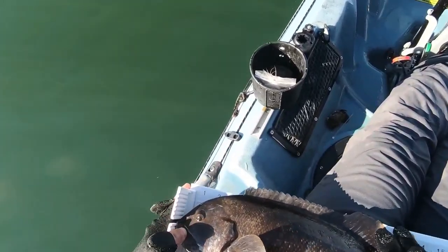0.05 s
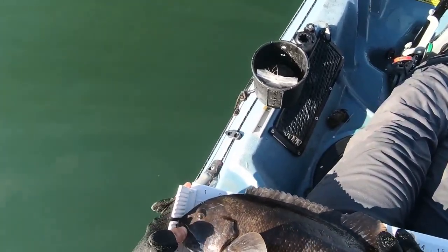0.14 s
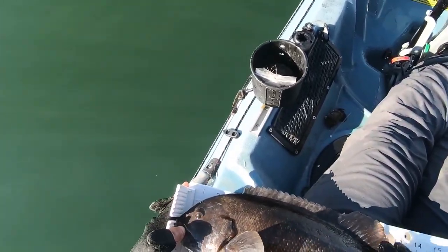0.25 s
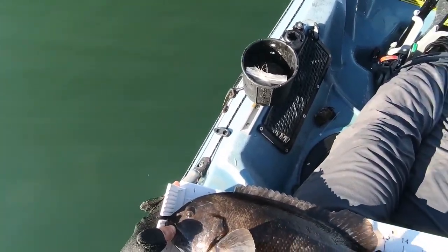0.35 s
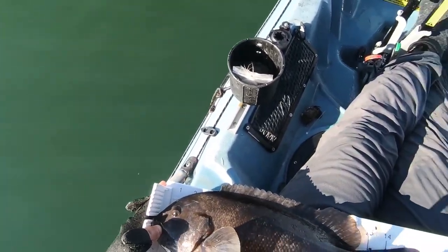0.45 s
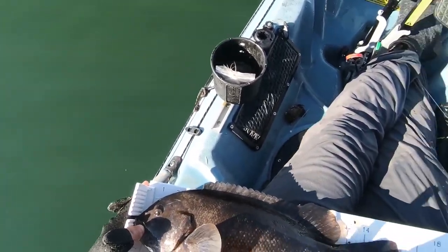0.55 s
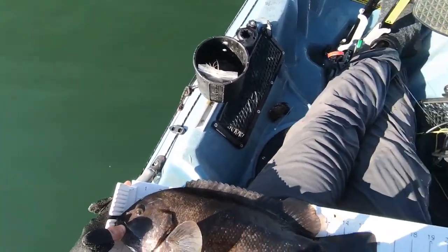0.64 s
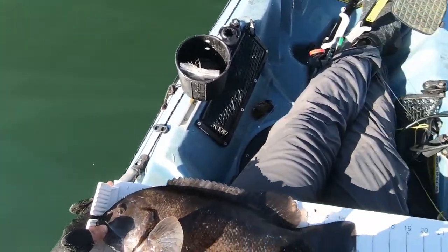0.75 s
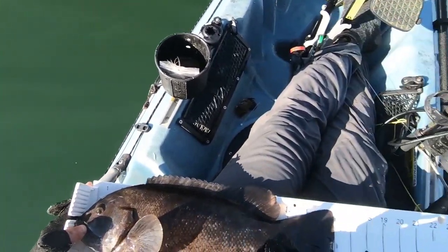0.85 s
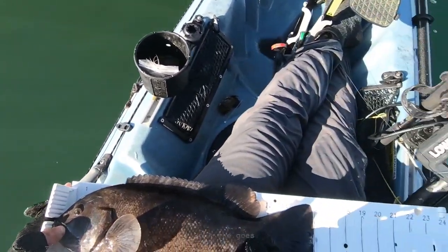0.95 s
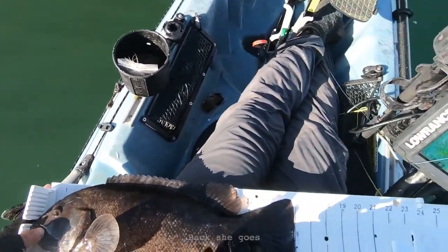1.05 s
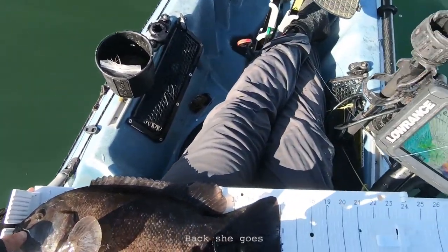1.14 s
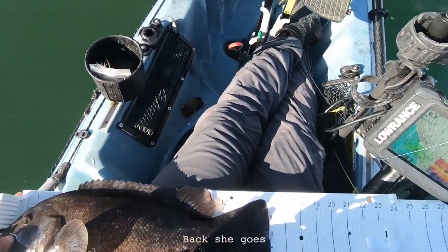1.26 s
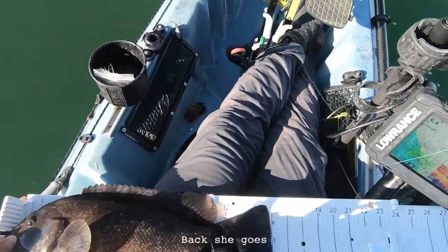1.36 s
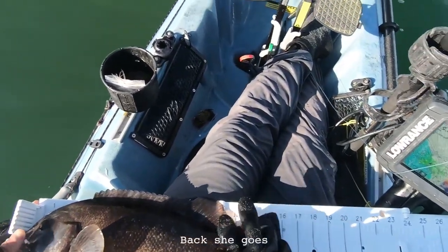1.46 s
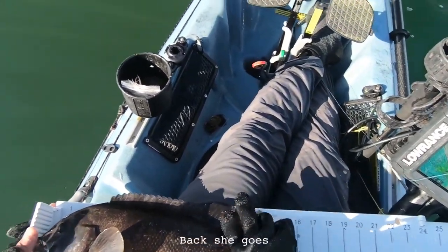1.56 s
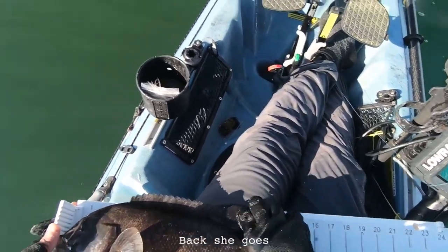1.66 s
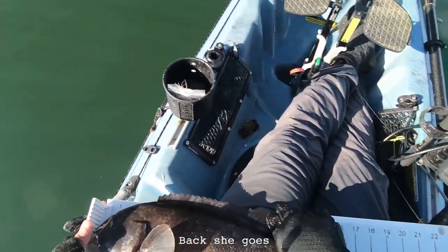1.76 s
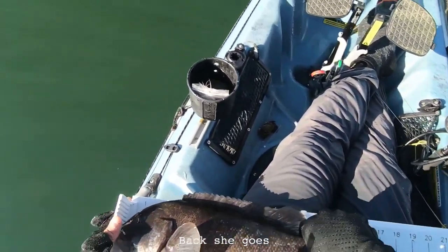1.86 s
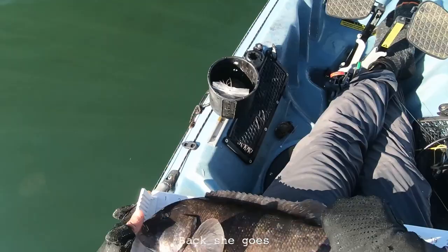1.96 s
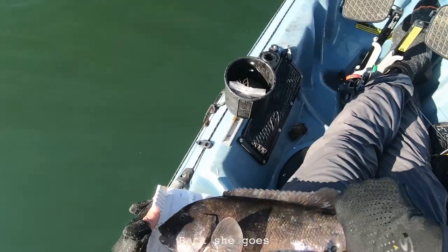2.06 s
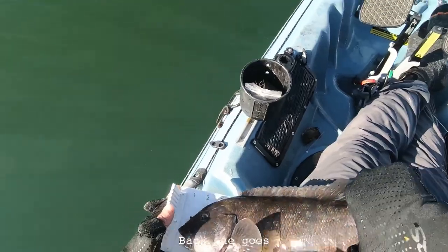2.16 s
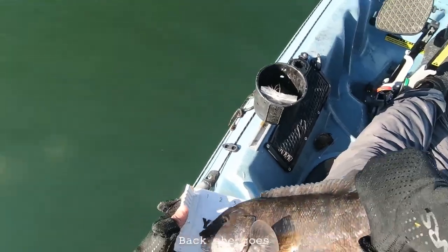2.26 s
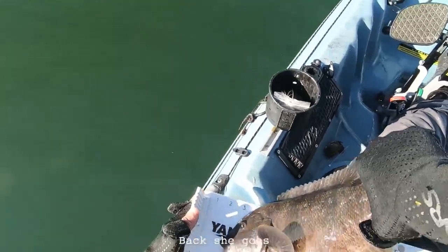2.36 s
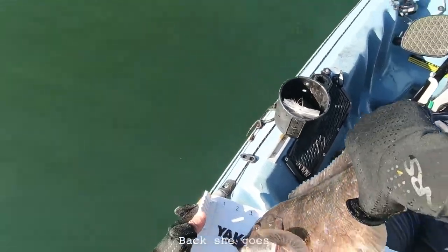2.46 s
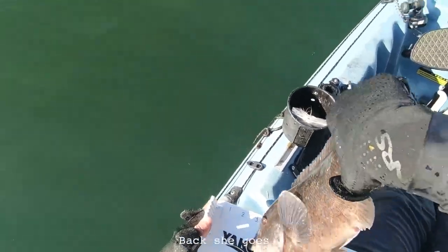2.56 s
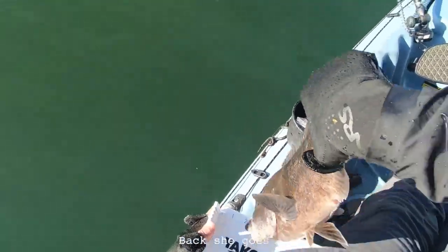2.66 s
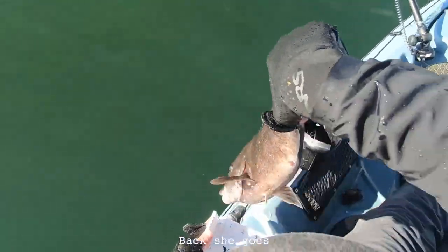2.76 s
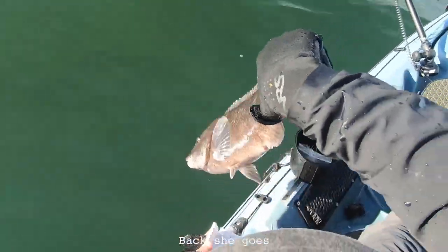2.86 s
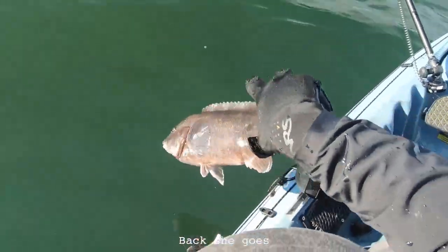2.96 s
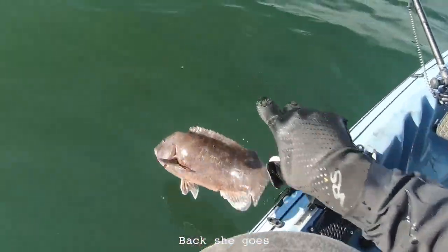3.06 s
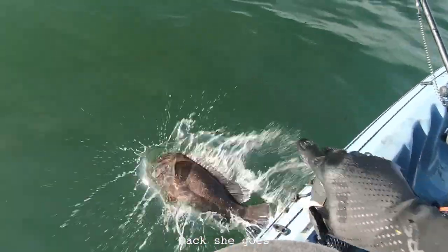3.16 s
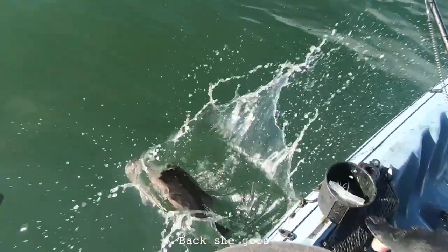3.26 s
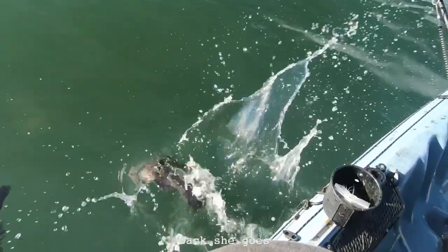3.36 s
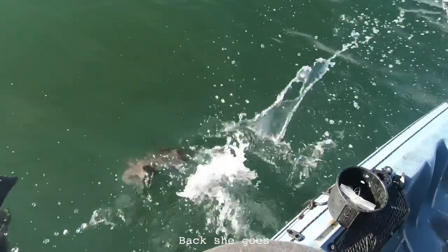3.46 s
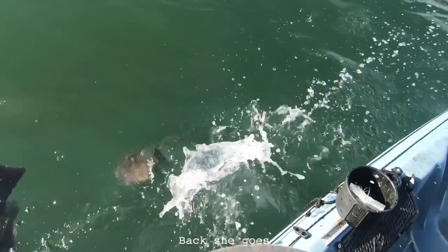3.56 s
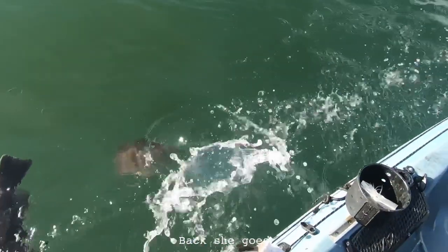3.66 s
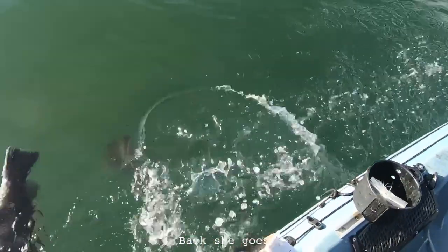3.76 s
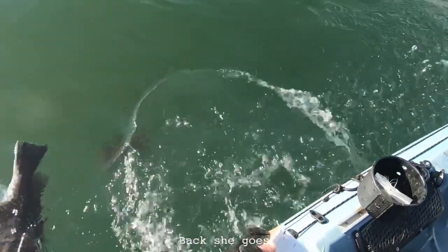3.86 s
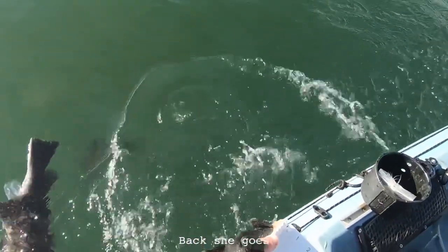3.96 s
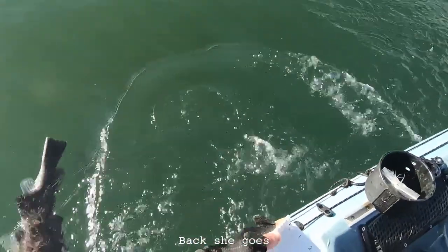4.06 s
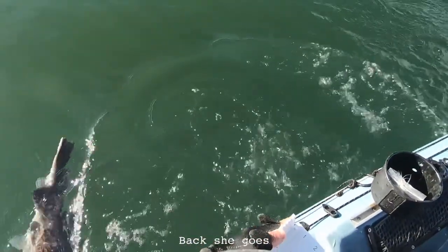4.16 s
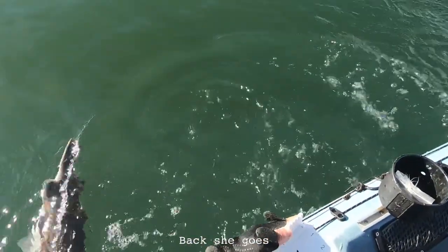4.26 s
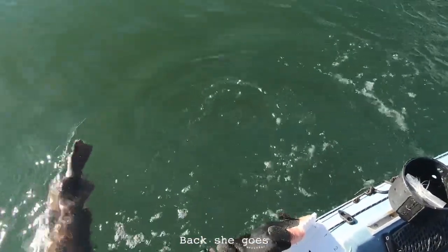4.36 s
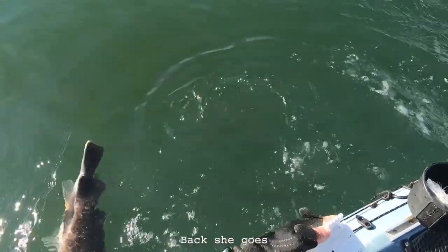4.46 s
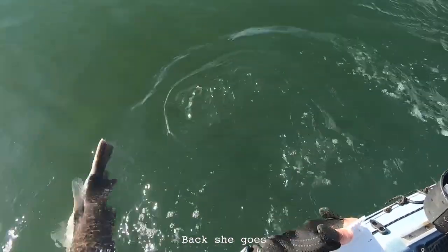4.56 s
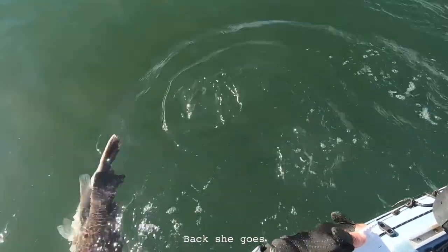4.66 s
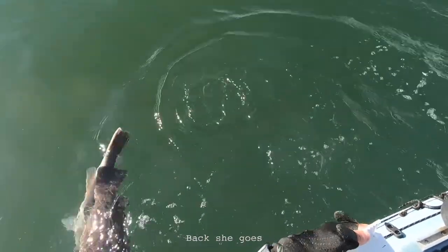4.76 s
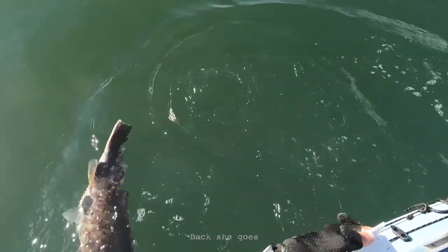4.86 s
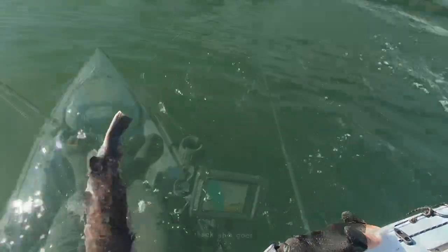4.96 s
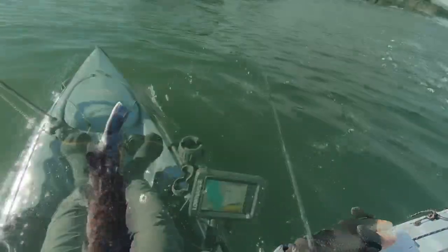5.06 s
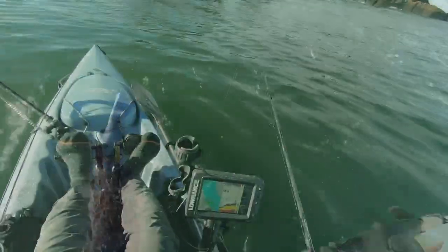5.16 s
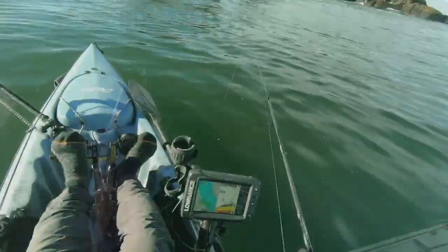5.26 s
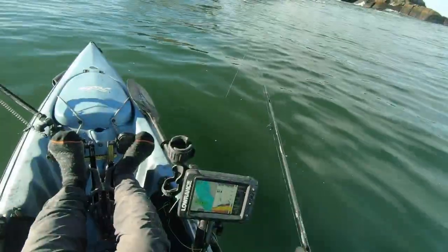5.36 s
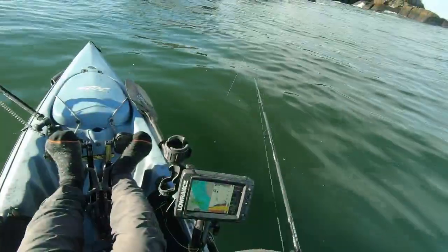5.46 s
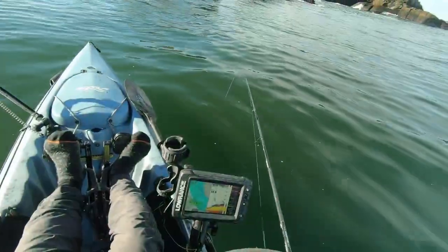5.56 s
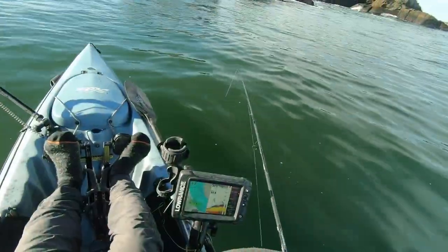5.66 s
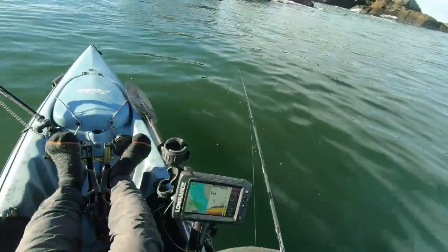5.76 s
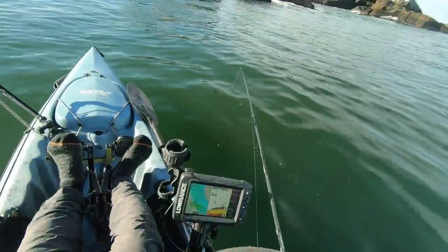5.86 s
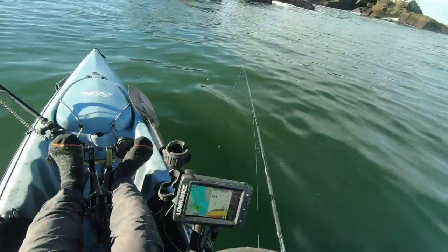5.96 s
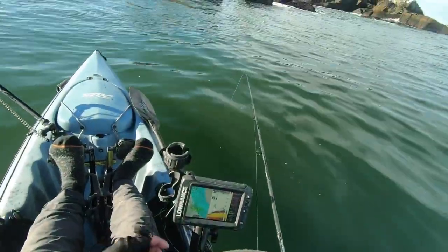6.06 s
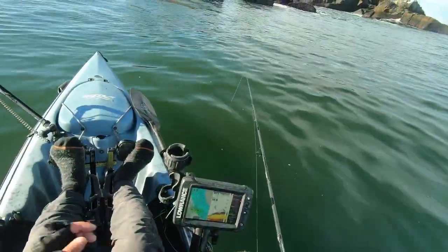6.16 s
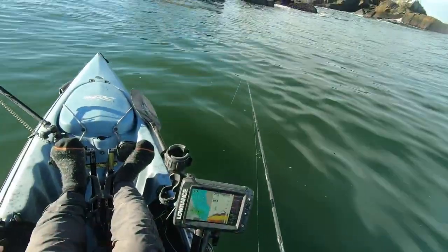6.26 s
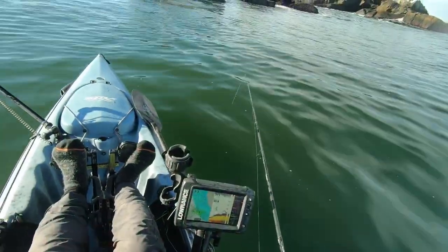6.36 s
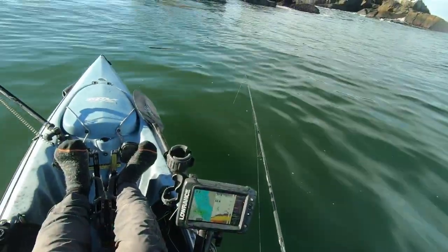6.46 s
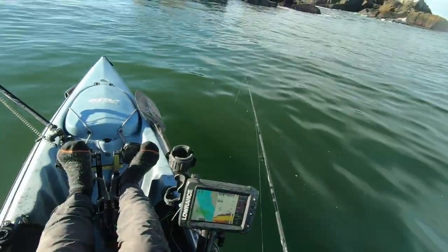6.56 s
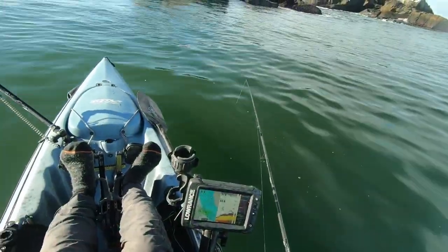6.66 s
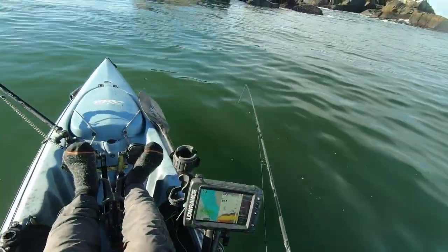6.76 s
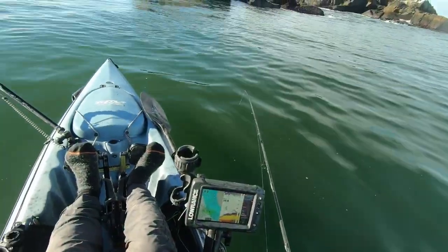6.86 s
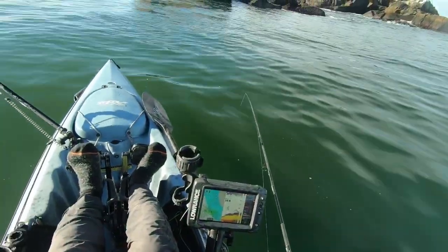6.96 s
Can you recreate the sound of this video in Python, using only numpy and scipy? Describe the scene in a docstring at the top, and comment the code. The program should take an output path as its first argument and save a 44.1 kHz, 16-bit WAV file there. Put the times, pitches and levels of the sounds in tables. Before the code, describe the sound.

Outdoors on a small plastic boat, low gusts buffet the microphone and the hull murmurs hollowly over an even wash of surf. A tossed fish slaps the water with a thick plop, torn splashes, ringing bubbles and bright spray that thin out within a second. A few small laps follow, then a hard sharp knock on the hull with tiny quick bounces, and afterwards wind, wash and faint gear ticks.

```python
"""A fish tossed from a kayak smacks into a calm sea and kicks: ringing air pockets, torn water, spray, flat smacks.
Then something hard knocks on the plastic boat and bounces, ringing the boat's damped modes; gear ticks drily.
Around it, shaped noise makes wind on the microphone and in the hull, water lapping below and surf on the shore.
Loud peaks make the gain control duck for a moment; one microphone feeds both channels, with its top cut off."""
import sys
import numpy as np
from scipy import signal
from scipy.io import wavfile
from scipy.ndimage import minimum_filter1d

SR = 44100
rng = np.random.default_rng(int(sys.argv[2]) if len(sys.argv) > 2 else 0)


def transcribe(signal):
    """Save signal, clipped to [-1, 1], as a 16-bit WAV file at the path in sys.argv[1]."""
    frames = np.atleast_2d(signal).T
    limited = np.clip(frames, -1, 1)
    pcm = np.round(limited * 32767).astype(np.int16)
    wavfile.write(sys.argv[1], SR, pcm)


N = 309582
T = np.arange(N) / SR


def from_db(db):
    """Decibels to amplitude gain."""
    return 10 ** (np.asarray(db) / 20)


def rms_one(x):
    """Scale to unit power."""
    return x / np.sqrt(np.mean(x ** 2) + 1e-20)


def in_time(rows):
    """Read each column of a time curve at every sample."""
    s, *columns = np.transpose(rows)
    return [np.interp(T, s, column) for column in columns]


def at_hz(points, hz):
    """Read a spectrum in dB on a log-frequency axis."""
    f, db = np.transpose(points)
    return np.interp(np.log(hz), np.log(f), db, left=-90, right=-90)


def add(out, s, sound):
    """Mix a sound in from s seconds on."""
    i = int(s * SR)
    out[i:i + len(sound)] += sound[:N - i]


def filtered(x, order, hz, kind="low"):
    """Butterworth filter."""
    return signal.sosfilt(signal.butter(order, hz, kind, fs=SR, output="sos"), x)


def drift(rate_hz):
    """Slow random wander with spread 1, made at a fortieth of the sample rate."""
    r = np.exp(-80 * np.pi * rate_hz / SR)
    white = rng.standard_normal(N // 40 + 2002)
    slow = signal.lfilter([1], [1, -2 * r, r * r], white)[2000:]   # drop the filter's start-up
    return np.interp(np.arange(N) / 40, np.arange(len(slow)), rms_one(slow))


def coloured_noise(colour, flicker_db, flicker_hz):
    """Third-octave bands of noise, each flickering on its own; rms 1."""
    out = np.zeros(N)
    white = rng.standard_normal((2, N))   # neighbouring bands get unrelated noise
    edges = 18 * 2 ** (np.arange(30) / 3)
    for k, band in enumerate(zip(edges, edges[1:])):
        hz = np.sqrt(band[0] * band[1])
        if colour[0][0] < hz < colour[-1][0]:
            gain = from_db(at_hz(colour, hz) + flicker_db * drift(flicker_hz))
            out += gain * filtered(white[k % 2], 2, band, "band")
    return rms_one(out)


def burst_power(rows):
    """Summed power of bursts that rise evenly and die away exponentially."""
    power = 0
    for s, db, rise, decay in rows:
        swell = np.clip((T - s) / rise, 0, 1)
        fade = np.exp(-np.maximum(T - s - rise, 0) / decay)
        power = power + (from_db(db) * swell * fade) ** 2
    return power


def bubble(hz, t60, swell_cycles, climb=0.082):
    """A trapped bubble swells in over a cycle or so, and its pitch climbs as it nears the surface."""
    t = T[:int(1.5 * t60 * SR) + 2]
    phase = 2 * np.pi * hz * (t + climb * t * t / (2 * t60))
    swell = 1 - np.exp(-(hz * t / swell_cycles) ** 2)
    return swell * np.exp(-np.log(1000) * t / t60) * np.sin(phase)


GUST_RISE_S, GUST_FALL_S = 0.027, 0.051


def gust(start, hold):
    """A gust swells, holds and dies away."""
    swell = np.clip((T - start) / GUST_RISE_S, 0, 1)
    return swell * np.exp(-np.maximum(T - start - hold, 0) / GUST_FALL_S)


# Gusts at the boat: start_s, hold_s, microphone_level_db, hull_rumble_level_db
GUST_ROWS = [(0, 0.088, -40.5, -43), (0.14, 0.27, -41, -39.5), (0.538, 0.25, -58.5, -35),
             (0.743, 0.077, -38.5, -38), (0.862, 0.27, -61, -35.5), (1.155, 0.044, -35.5, -33.5),
             (1.255, 0.27, -44, -39), (1.547, 0.086, -35.5, -41.5), (1.87, 0.46, -43, -55),
             (2.535, 0.062, -33, -37.5), (2.772, 0.18, -62, -40), (3.007, 0.087, -29.5, -31.5),
             (3.12, 0.11, -35.5, -46), (3.25, 0.14, -37.5, -54), (3.5, 0.21, -61, -41),
             (3.793, 0.18, -42, -40.5), (4.016, 0.22, -61, -41), (4.264, 0.85, -36, -36),
             (4.502, 0.22, -37.5, -39.5), (5.295, 0.092, -32, -42.5), (5.495, 0.091, -41, -36.5),
             (5.625, 0.1, -34, -29), (5.737, 0.16, -36.5, -36.5), (5.955, 0.22, -41.5, -51),
             (6.312, 0.73, -40, -56), (6.59, 0.053, -28.5, -42.5), (6.764, 0.3, -36.5, -44)]
# Spectrum of wind on the microphone: frequency_hz, level_db (per Hz)
WIND_SPECTRUM = [(15, -9), (25, 0), (50, -0.5), (75, 0), (100, -4), (135, -6.5)]
# Spectrum of the hull's rumble: frequency_hz, level_db (per Hz)
RUMBLE_SPECTRUM = [(70, -5.5), (110, -16), (170, 6), (220, -2.5), (300, -7.5), (450, -28)]
BREEZE_DB, HULL_MURMUR_DB = -48, -48   # steady floor under the gusts


def wind(hollow_hz=172, hollow_q=5.9, hollow_db=-5.0, turbulence_db=1.53):
    """Each gust presses lumpily on the microphone and sounds the hollow of the hull."""
    buffet_power, rumble_power = from_db(BREEZE_DB) ** 2, from_db(HULL_MURMUR_DB) ** 2
    for start, hold, buffet_db, rumble_db in GUST_ROWS:
        shape = gust(start, hold)
        buffet_power = buffet_power + (from_db(buffet_db) * shape) ** 2
        rumble_power = rumble_power + (from_db(rumble_db) * shape) ** 2
    buffet = coloured_noise(WIND_SPECTRUM, flicker_db=0.5, flicker_hz=5.7)
    resonance = signal.iirpeak(hollow_hz, hollow_q, fs=SR)
    hollow = rms_one(signal.lfilter(*resonance, rng.standard_normal(N)))
    hollow = filtered(hollow, 2, 2 * hollow_hz)
    rumble = coloured_noise(RUMBLE_SPECTRUM, flicker_db=1.5, flicker_hz=8.4)
    rumble = rms_one(rumble + from_db(hollow_db) * hollow)
    turbulence = from_db(turbulence_db * drift(12.8))
    return turbulence * (np.sqrt(buffet_power) * buffet + np.sqrt(rumble_power) * rumble)


# Surf on the shore: time_s, body_level_db, hiss_level_db, foam_level_db
SURF_LEVELS = [(0.1, -40.5, -49.5, -70.5), (0.5, -37, -48.5, -69), (0.8, -38, -49.5, -72.5),
               (1.3, -40, -50.5, -73.5), (1.8, -39.5, -50, -71.5), (2.15, -43.5, -52, -71.5),
               (2.7, -39.5, -48, -67.5), (4.35, -40, -53, -74), (4.85, -39, -50, -63.5),
               (5.4, -40, -50.5, -71), (5.85, -39.5, -50, -71), (6.2, -43, -50.5, -69.5),
               (6.45, -41, -48.5, -67.5), (6.82, -42.5, -50, -67), (7.0, -43.5, -51, -76)]
# The surf's midrange: time_s, level_db
RUSH_LEVELS = [(0.3, -47.5), (1.3, -52), (2.3, -50), (3.1, -47.5), (4.6, -48.5), (5.6, -46.5), (7.0, -47)]
# Spectra of the surf's dull body, midrange rush, hiss and foam: frequency_hz, level_db (per Hz)
BODY_SPECTRUM = [(200, 1), (320, -3.5), (450, 0.5), (600, 1.5), (800, -2), (1000, -12), (1150, -26)]
RUSH_SPECTRUM = [(900, 0.5), (1300, 0.5), (1900, -10.5)]
HISS_SPECTRUM = [(1450, 0.5), (2000, 2.5), (2600, 2), (3200, 0), (4100, -6.5), (4700, -20)]
FOAM_SPECTRUM = [(4600, -18), (5200, 5.5), (6500, 4), (8200, 1.5), (10400, -23), (14000, -15.5)]


def sea():
    """Surf as an even wash of noise: a dull body, a midrange rush, hiss and a trace of foam."""
    body_db, hiss_db, foam_db = in_time(SURF_LEVELS)
    rush_db, = in_time(RUSH_LEVELS)
    body = from_db(body_db) * coloured_noise(BODY_SPECTRUM, flicker_db=2.06, flicker_hz=15.0)
    rush = from_db(rush_db) * coloured_noise(RUSH_SPECTRUM, flicker_db=1.8, flicker_hz=28)
    hiss = from_db(hiss_db) * coloured_noise(HISS_SPECTRUM, flicker_db=1.17, flicker_hz=49)
    foam = from_db(foam_db) * coloured_noise(FOAM_SPECTRUM, flicker_db=1.3, flicker_hz=30)
    return body + rush + hiss + foam


# Wavelets under the hull: start_s, level_db, rise_s, decay_s, pitch_hz
LAP_ROWS = [(0.04, -37, 0.063, 0.72, 527), (2.919, -38, .001, .004, 900), (2.936, -37, 0.0043, 0.012, 714),
            (2.984, -38, .001, 0.0033, 850), (4.2, -44, 0.15, 0.4, 340),
            (4.237, -27.5, 0.00082, 0.0035, 1090), (4.262, -43, .005, .04, 1100),
            (4.772, -37.5, .001, 0.0044, 2400), (4.793, -42, 0.0008, 0.0042, 1400),
            (5.6, -53, .1, 0.67, 780), (6.88, -37, .06, .08, 586)]


def laps(width=1.124):
    """Wavelets meet the hull: dull bursts of noise, short slaps or long sloshes, each with its own pitch."""
    out = np.zeros(N)
    for *burst, hz in LAP_ROWS:
        slosh = filtered(rng.standard_normal(N), 1, [hz / width, hz * width], "band")
        slosh = filtered(slosh, 2, [hz / 2, 2 * hz], "band")
        out += rms_one(slosh) * np.sqrt(burst_power([burst]))
    return out


# Big pockets of air and fat drops: start_s, level_db (before ring_db or snap_db), pitch_hz, t60_s
PLOP_ROWS = [(2.940, -27, 650, 0.035), (3.244, -26.5, 2520, .008), (3.27, -7.5, 650, 0.007),
             (3.278, -17, 1140, 0.0088), (3.2842, -23, 490, 0.016), (3.285, -21, 3460, 0.0088),
             (3.293, -15, 2880, 0.004), (3.3, -20, 1640, 0.019), (3.317, -21, 690, 0.013),
             (3.3215, -27, 4270, 0.016), (3.321, -27.5, 2630, 0.049), (3.323, -27, 575, .035),
             (3.329, -29, 2850, .025), (3.338, -27.5, 1170, .02), (3.367, -27, 1150, .015),
             (3.369, -26, 1560, 0.017), (3.3937, -14.5, 2710, 0.0088), (3.3937, -14, 4910, 0.007),
             (3.394, -21.5, 405, 0.03), (3.404, -17, 3700, 0.0078), (3.4408, -8.5, 1630, 0.0046),
             (3.4425, -25, 2430, 0.013), (3.450, -28, 570, 0.12), (3.452, -22, 4070, .011),
             (3.4677, -19.5, 1190, .018), (3.4765, -16, 2500, 0.016), (3.484, -13, 3170, 0.008),
             (3.4865, -22, 4820, .009), (3.496, -20, 3100, 0.019), (3.497, -23, 4700, .009),
             (3.501, -19, 3850, 0.0089), (3.502, -23, 3000, .012), (3.518, -24, 2900, .013),
             (3.519, -27, 1790, 0.015), (3.540, -30, 2000, 0.012), (3.553, -28, 2831, .012),
             (3.572, -27, 4100, .008), (3.582, -24.5, 2800, 0.016), (3.586, -29, 1170, 0.027),
             (3.605, -31, 1020, 0.051), (3.62, -30, 1280, 0.037), (3.621, -33, 2320, 0.01),
             (3.700, -29, 2620, .013), (3.766, -32, 3140, 0.011), (3.798, -30, 1440, .012),
             (3.803, -26.5, 820, 0.036), (3.817, -26, 3220, 0.011), (3.822, -28, 780, .028),
             (3.828, -23.5, 2220, .012), (3.835, -29, 3290, .012), (3.904, -24, 3200, .01),
             (3.910, -16, 700, 0.03), (3.918, -23, 1070, 0.022), (3.922, -30, 2650, 0.012),
             (3.9385, -26, 2550, 0.014), (3.950, -25, 606, 0.043), (3.957, -24, 1530, 0.012),
             (3.967, -26.5, 1120, 0.052), (4.026, -31.5, 2720, 0.014), (4.113, -32, 1790, .01),
             (4.238, -19.5, 775, 0.014), (4.239, -19, 414, 0.031), (4.266, -27, 422, 0.086),
             (4.294, -36, 2020, 0.013), (4.772, -30, 1210, 0.017), (4.793, -24, 1000, .007),
             (4.7935, -29, 2000, 0.0092), (4.796, -17, 416, 0.022)]


def plops(ring_db=3.0, snap_db=-22.5, snap_s=0.0012):
    """The surface snaps shut with a wet tick as the pocket of air starts to ring."""
    out, t = np.zeros(N), T[:SR // 100]
    for s, db, hz, t60 in PLOP_ROWS:
        noise = filtered(rng.standard_normal(len(t)), 2, [hz, min(4 * hz, SR / 4)], "band")
        snap = rms_one(noise) * np.exp(-t / snap_s)
        add(out, s, from_db(db + snap_db) * snap)
        add(out, s, from_db(db + ring_db) * bubble(hz, t60, swell_cycles=0.65))
    return out


# Rain of spray, rising and thinning out: time_s, level_db (before each layer's own level)
SPRAY_LEVELS = [(3.22, -76), (3.28, -34.5), (3.38, -43), (3.46, -33), (3.71, -44), (3.87, -37.5),
                (4.02, -41), (4.09, -51.5), (4.3, -55.5), (4.65, -62.5)]
# Spectrum of the splash, for its drops and its fizz: frequency_hz, level_db (per Hz)
SPLASH_SPECTRUM = [(300, -19), (500, 8.5), (700, -0.5), (1200, -1.5), (1800, 0), (2800, 2), (4300, -5),
                   (6000, -13), (8000, -4), (10200, -42), (12000, -16), (15500, -33)]
SPRAY_START_S, SPRAY_END_S = SPRAY_LEVELS[0][0], SPRAY_LEVELS[-1][0]


def droplets(per_s, level, cycles=27.0, cycles_spread=1.0, spread_db=2.5, low_hz=650, high_hz=5500):
    """Drops land at random, each a tiny bubble with its own size, pitch and ring, scaled to hold the level."""
    landing = (rng.random(N) < per_s / SR) & (T > SPRAY_START_S) & (T < SPRAY_END_S)
    at = np.flatnonzero(landing)
    size, pitch, ring, sign = rng.random((N, 4))[at].T
    pitches = low_hz * (high_hz / low_hz) ** pitch
    size_db = spread_db * np.minimum(-np.log(size), np.e)   # many small, few big
    sizes = rms_one(from_db(at_hz(SPLASH_SPECTRUM, pitches) + size_db) * np.sqrt(pitches))
    t60s = cycles * np.exp(cycles_spread * np.pi * (ring - .5)) / pitches
    out = np.zeros(N)
    for i, hz, t60, height in zip(at, pitches, t60s, sizes * np.sign(sign - .5)):
        drop = bubble(hz, t60, swell_cycles=1.0)
        share = np.sqrt(SR / per_s[i] / np.sum(drop ** 2))   # denser rain, weaker drops
        add(out, T[i], height * level[i] * share * drop)
    return out


# Sheets of water thrown up and falling back: start_s, level_db (before each layer's own level), rise_s, decay_s
GUSH_ROWS = [(3.268, -26, 0.013, 0.012), (3.290, -24, 0.0041, 0.01), (3.317, -43, 0.008, 0.017),
             (3.39, -32, 0.0025, 0.017), (3.443, -30.5, 0.0075, 0.014), (3.481, -29.5, 0.0044, 0.0069),
             (3.494, -33, 0.0063, 0.01), (3.516, -38, .003, .009), (3.549, -42, .003, 0.0055),
             (3.695, -41, 0.0041, 0.01), (3.810, -35, 0.014, 0.018), (3.899, -36, 0.014, 0.036),
             (3.944, -30, 0.0054, 0.0071)]
# Spectrum of the fine mist: frequency_hz, level_db (per Hz)
MIST_SPECTRUM = [(5800, -1), (7500, -3), (10200, -5), (12000, -14), (15500, -10)]
DROPS_PER_S, DROPS_AT_DB, DROPS_FOLLOW = 1300, -38, .8   # rate at this level; exponent of its growth
CLUMP_DB, CLUMP_HZ = 2.0, 30   # drops land in clumps: swing and speed of their loudness


def splash(drops_db=-0.5, pockets_db=-6, fizz_db=-4.0, mist_db=-23.0, crackle_db=1.5):
    """Sheets of water tear into drops, pockets of air, crackling fizz and a fine bright mist."""
    level = np.sqrt(burst_power(GUSH_ROWS) + from_db(in_time(SPRAY_LEVELS)[0]) ** 2)
    per_s = DROPS_PER_S * (level / from_db(DROPS_AT_DB)) ** DROPS_FOLLOW   # a falling sheet brings more drops
    clumps = rms_one(from_db(CLUMP_DB * drift(CLUMP_HZ)))
    drops = from_db(drops_db) * droplets(per_s, level * clumps)
    pockets = droplets(np.full(N, 90), level, cycles=33, cycles_spread=.4, low_hz=464, high_hz=3540)
    fizz = from_db(fizz_db) * coloured_noise(SPLASH_SPECTRUM, flicker_db=3.5, flicker_hz=60)
    mist = from_db(mist_db) * coloured_noise(MIST_SPECTRUM, flicker_db=2.0, flicker_hz=40)
    crackle = rms_one(from_db(crackle_db * drift(150)))   # tiny impacts flash across all bands at once
    airborne = (T > SPRAY_START_S) & (T < SPRAY_END_S)
    return drops + from_db(pockets_db) * pockets + airborne * level * crackle * (fizz + mist)


# Fat drops that smack the surface flat, without a bubble: start_s, level_db (before gain_db), pitch_hz
SMACK_ROWS = [(3.267, -24, 2600), (3.293, -16, 4200), (3.309, -25, 2800), (3.3944, -22, 7800),
              (3.4243, -17, 4200), (3.468, -26, 3500), (3.484, -21, 4600), (3.517, -26.5, 2500),
              (3.5535, -25, 3395), (3.5822, -28, 4200), (3.612, -24, 3200), (3.701, -22.5, 2480),
              (3.755, -27, 3200), (3.8272, -21, 3200), (3.834, -21, 4000), (3.8963, -21, 4500),
              (3.902, -26, 5060), (3.929, -18.5, 6700), (3.948, -25.5, 5500), (3.9765, -32, 4500),
              (4.055, -36, 6000), (4.095, -42, 5500), (4.155, -43, 5500)]


def smacks(rise_s=0.0003, decay_s=0.0015, gain_db=-4.0):
    """A fat drop spreads on the surface: one short, broad crack of noise."""
    out, t = np.zeros(N), T[:SR // 80]
    shape = (1 - np.exp(-t / rise_s)) * np.exp(-t / decay_s)
    for s, db, hz in SMACK_ROWS:
        noise = filtered(rng.standard_normal(len(t)), 2, [hz / 1.7, 1.4 * hz], "band")
        add(out, s, from_db(db + gain_db) * rms_one(noise) * shape)
    return out


# Ticks of gear: start_s, level_db, pitch_hz
TICK_ROWS = [(4.9365, -56, 6200), (5.649, -62, 7300), (5.719, -44.5, 4870), (6.600, -48, 5800)]


def ticks(decay_s=0.0022):
    """Fishing gear shifts with small dry ticks: short decaying bands of noise."""
    out, t = np.zeros(N), T[:SR // 50]
    for s, db, hz in TICK_ROWS:
        noise = filtered(rng.standard_normal(len(t)), 2, [.8 * hz, 1.25 * hz], "band")
        add(out, s, from_db(db) * rms_one(noise) * np.exp(-t / decay_s))
    return out


# The knock on the boat and its bounces: start_s, strength_db, contact_s
KNOCK_ROWS = [(4.9992, -0.5, 0.00019), (5.0388, -18, 0.00035), (5.0404, -13.5, 0.00047),
              (5.0438, -27, 0.0012), (5.0842, -26, 0.00042), (5.089, -31, 0.0006), (5.112, -36, 0.00055),
              (5.118, -30, 0.00033), (5.122, -33.5, 0.00042), (5.13, -30, 0.00031), (5.182, -30, 0.00042)]
# What the boat rings with: pitch_hz, level_db (relative), t60_s
BOAT_RINGS = [(193, -3.5, 0.032), (270, -4, 0.029), (385, -0.5, 0.028), (488, 0, 0.021), (604, -7.5, 0.049),
              (700, -4, 0.028), (907, -16.5, 0.078), (976, -0.5, 0.018), (1093, -6, 0.031),
              (1279, -6.5, 0.041), (1430, -12, 0.025), (1645, -9.5, 0.026), (1860, -2, 0.029),
              (2066, 0.5, 0.02), (2290, -8, 0.04), (2431, -7, 0.042), (2676, -4, 0.031), (3030, -10, 0.022),
              (3186, -14, 0.037), (3470, -5, 0.021), (4100, -11.5, 0.034), (4770, -8.5, 0.024),
              (5200, -10, 0.018), (5600, -7, 0.014), (6600, -22, 0.013), (7500, -9, 0.016),
              (7838, -6, 0.016), (9580, 6.5, 0.011)]
MODE_SCATTER_DB = 2   # no two contacts strike the modes alike
MODE_LAG_CYCLES, CRACK_DECAY_S = .4, .0045   # each mode starts this many of its cycles late


def knocks(crack_db=4.5, crack_hz=9000, lowest_hz=70):
    """Each contact rings the boat's damped modes under a short bright crack; longer contacts are duller."""
    out, t = np.zeros(N), T[:SR // 8]
    for s, db, contact in KNOCK_ROWS:
        scatter_db = rng.normal(0, MODE_SCATTER_DB, len(BOAT_RINGS))
        body = np.zeros(len(t))
        for k, (hz, level_db, t60) in enumerate(BOAT_RINGS):
            age = np.maximum(t - MODE_LAG_CYCLES / hz, 0)
            ring = np.exp(-np.log(1000) * age / t60) * np.sin(2 * np.pi * hz * age)
            body += (-1) ** k * from_db(level_db + scatter_db[k]) * ring
        crack = filtered(rng.standard_normal(len(t)), 1, crack_hz, "high") * np.exp(-t / CRACK_DECAY_S)
        push = np.exp(-7 * t / contact) * (t + 1 / SR) ** 3   # force during the contact
        struck = signal.fftconvolve(body + from_db(crack_db) * crack, push / push.sum())
        add(out, s, from_db(db) * struck)
    return filtered(out, 2, lowest_hz, "high")


def scene(side_noise_db=-90.0):
    """One microphone feeds both channels; an inaudible noise is added to one and taken from the other."""
    mono = wind() + sea() + laps() + plops() + splash() + smacks() + ticks() + knocks()
    side = from_db(side_noise_db) * coloured_noise(FOAM_SPECTRUM, flicker_db=2.5, flicker_hz=10)
    return np.array([mono + side, mono - side])


def excess_db(x, threshold_db, most_db):
    """How far the louder channel exceeds a threshold, up to a limit."""
    return np.clip(20 * np.log10(np.abs(x).max(axis=0) + 1e-9) - threshold_db, 0, most_db)


def hold_peak(db, hold_s):
    """Keep each peak of a level for a while."""
    half = int(hold_s * SR / 2)
    return -minimum_filter1d(-db, 2 * half + 1, origin=half)


def follow(db, attack_s, release_db_per_s):
    """Follow a level with a smooth attack and an even release."""
    released = np.maximum.accumulate(db + release_db_per_s * T) - release_db_per_s * T
    r = np.exp(-1 / (attack_s * SR))
    return signal.lfilter([1 - r], [1, -r], released)


def gain_control(x, threshold_db=-10.5, most_db=6.0, hold_s=.184, attack_s=0.00065, release_db_per_s=900,
                 treble_hz=3000, treble_share=0.045, switch_db=-32.0, overshoot_db=12.5, settle_s=0.28):
    """A loud peak ducks the gain, treble most; after a hold it lets go with a click and treble overshoots."""
    held = hold_peak(excess_db(x, threshold_db, most_db), hold_s)
    cut_db = follow(held, attack_s, release_db_per_s)
    let_go = np.diff(1.0 * (held > most_db / 2), prepend=0) < 0
    lift_db = overshoot_db * signal.lfilter([1], [1, -np.exp(-1 / (settle_s * SR))], let_go)
    lows = filtered(x, 1, treble_hz)
    highs = filtered(x, 1, 2 * treble_hz, "high")
    shaped = lows + (x - lows) * from_db(-treble_share * cut_db) + highs * (from_db(lift_db) - 1)
    return shaped * from_db(-cut_db) + from_db(switch_db) * let_go


def hush(x, threshold_db=-8.0, most_over_db=7.0, depth=1.4, hold_s=.075, attack_s=.018,
         release_db_per_s=350, corner_hz=900):
    """After a loud peak the upper range is briefly turned down further."""
    held = hold_peak(excess_db(x, threshold_db, most_over_db), hold_s)
    cut_db = depth * follow(held, attack_s, release_db_per_s)
    lows = filtered(x, 1, corner_hz)
    return lows + (x - lows) * from_db(-cut_db)


TREBLE_EDGE_HZ, TREBLE_LEAK_DB, CUTOFF_HZ = 10600, -9.5, 15750


def record(dry):
    """Gain control, overload on the highest peaks, a steep step down in the treble, and the top cut off."""
    clipped = np.clip(hush(gain_control(dry)), -.92, .92)
    below_edge = filtered(clipped, 16, TREBLE_EDGE_HZ)
    above_edge = filtered(clipped, 16, TREBLE_EDGE_HZ, "high")
    stepped = below_edge + from_db(TREBLE_LEAK_DB) * above_edge
    return signal.sosfilt(signal.ellip(10, .1, 80, CUTOFF_HZ, fs=SR, output="sos"), stepped)


dry = scene()
out = record(dry)
transcribe(out)
```